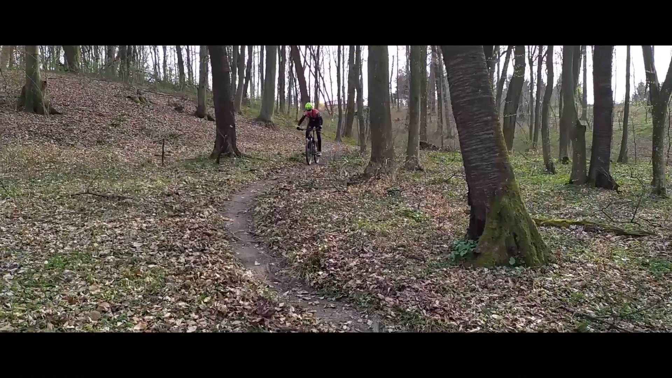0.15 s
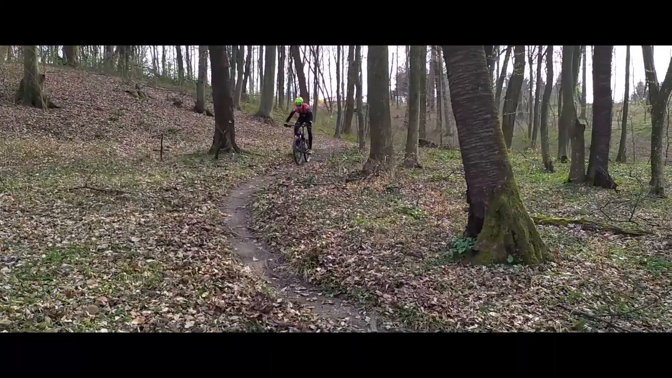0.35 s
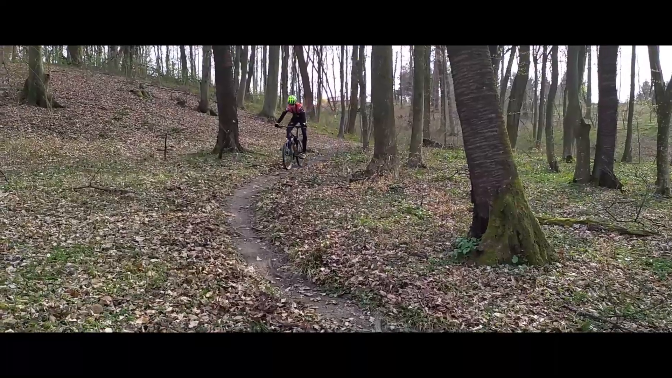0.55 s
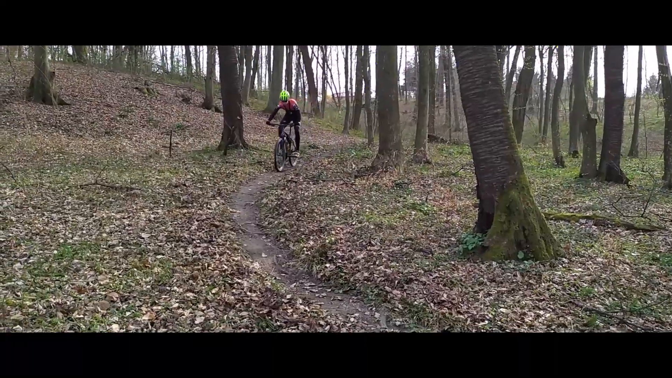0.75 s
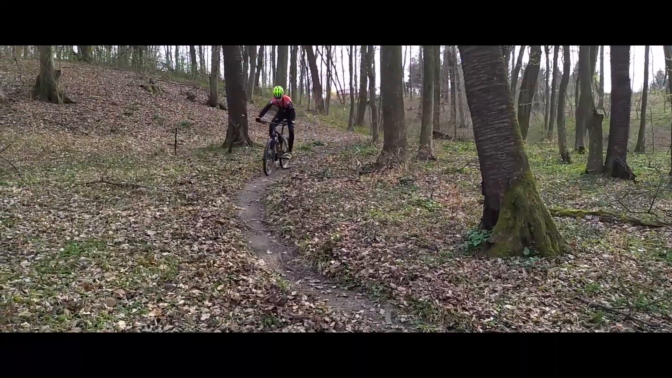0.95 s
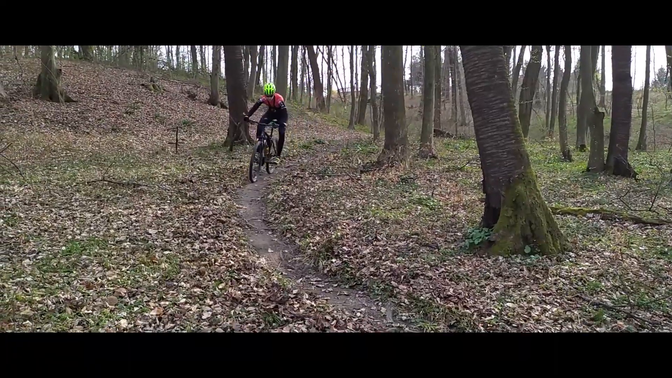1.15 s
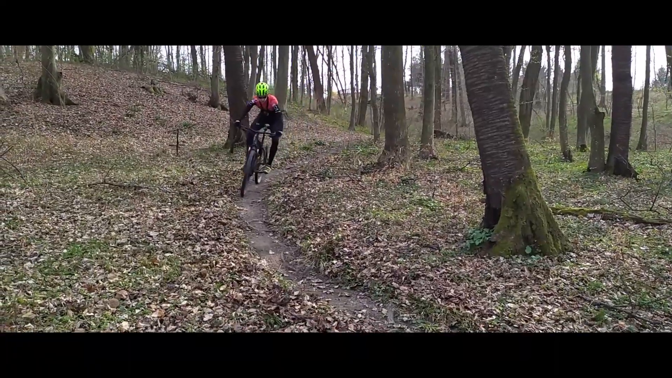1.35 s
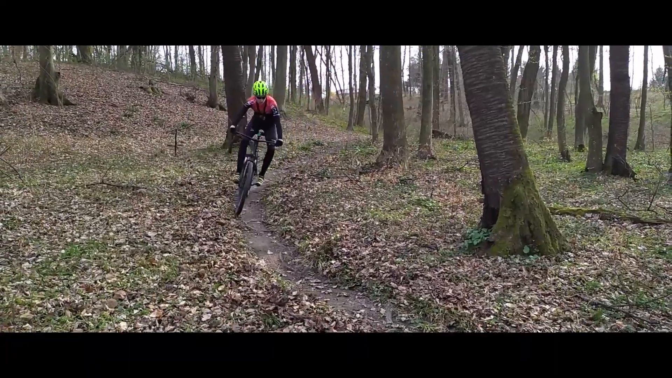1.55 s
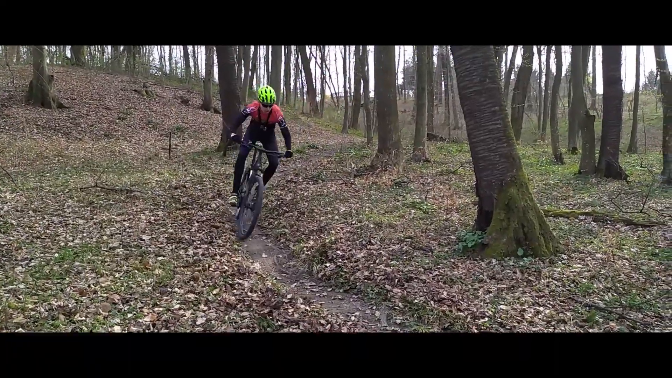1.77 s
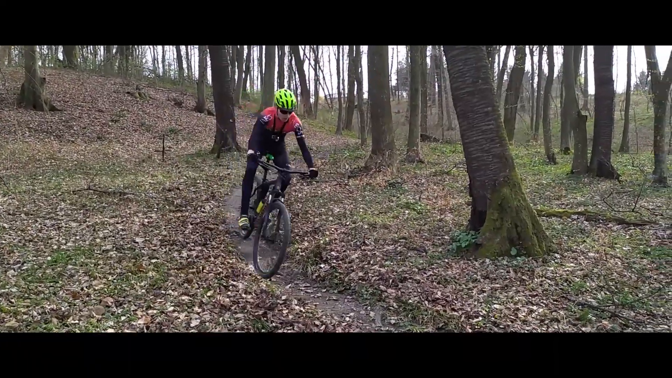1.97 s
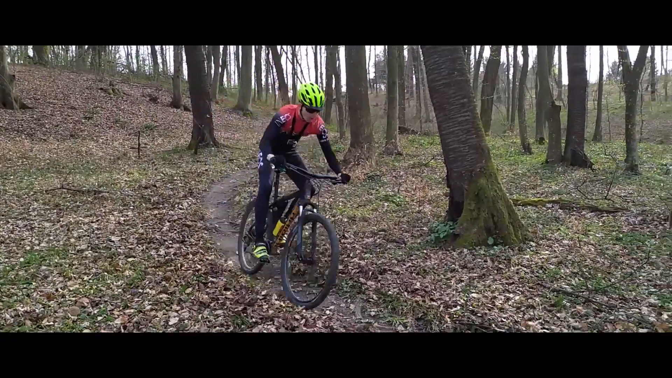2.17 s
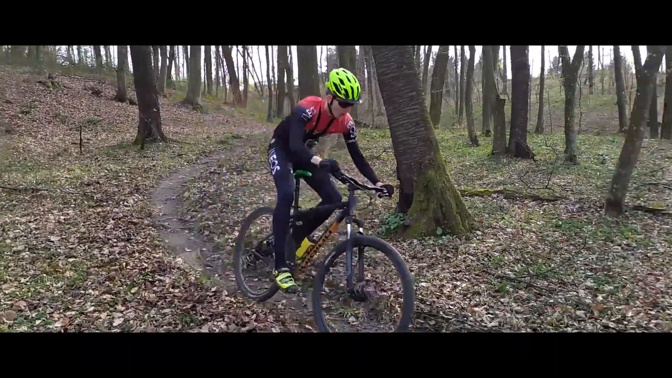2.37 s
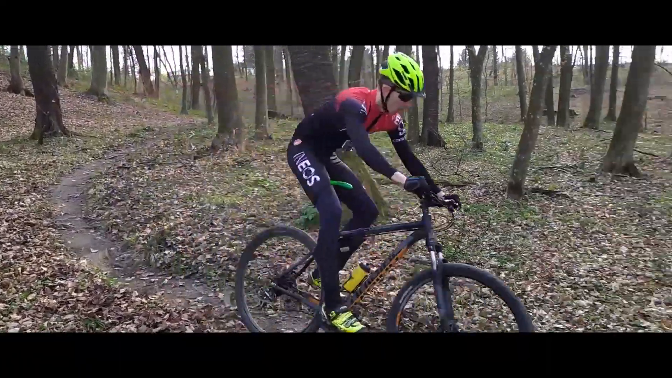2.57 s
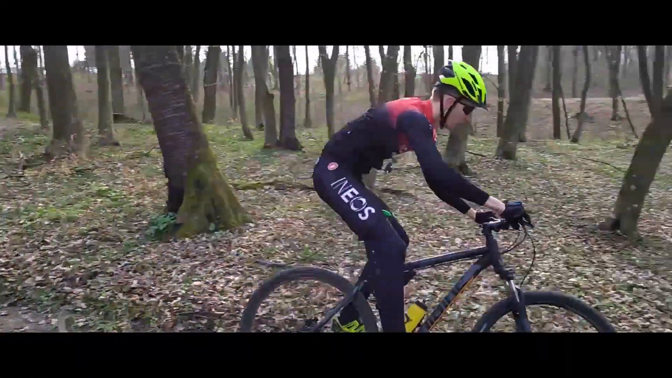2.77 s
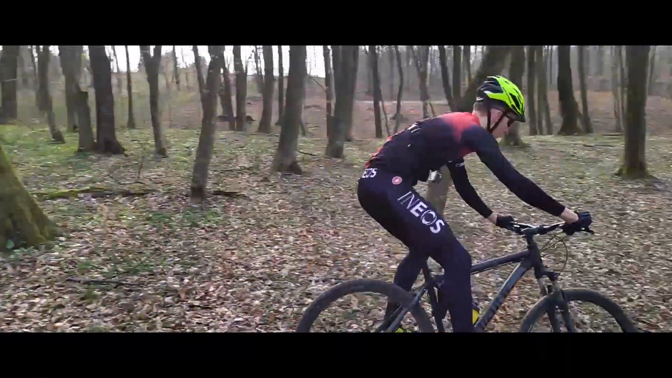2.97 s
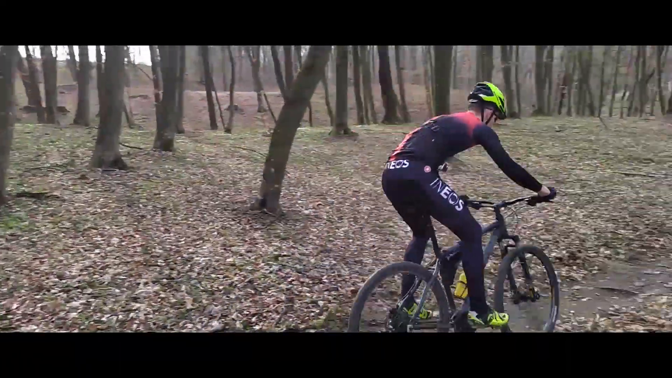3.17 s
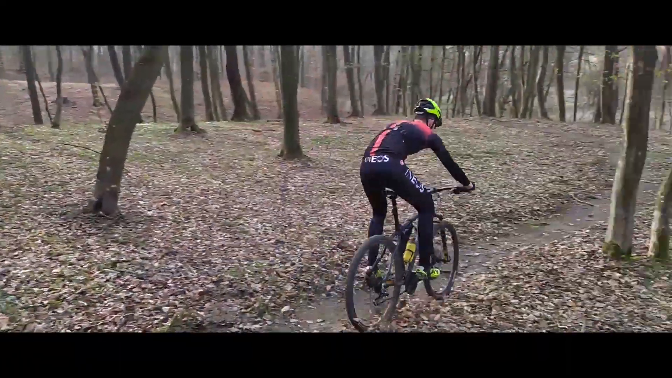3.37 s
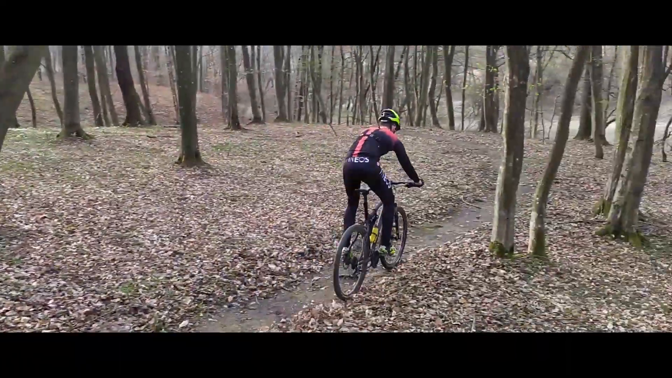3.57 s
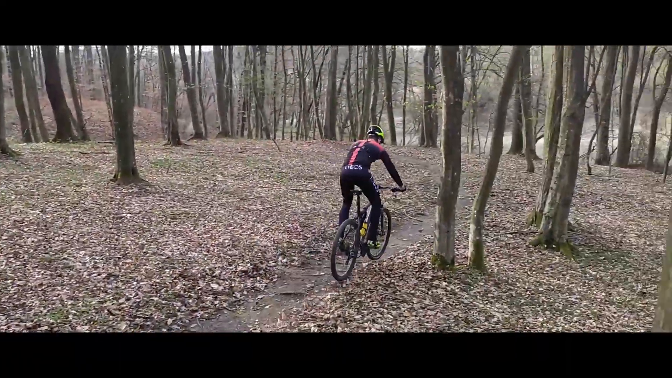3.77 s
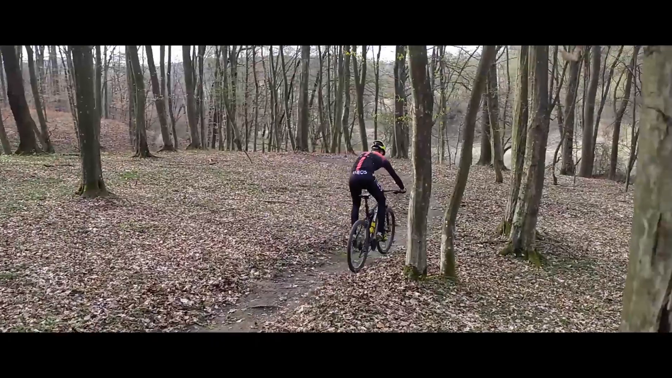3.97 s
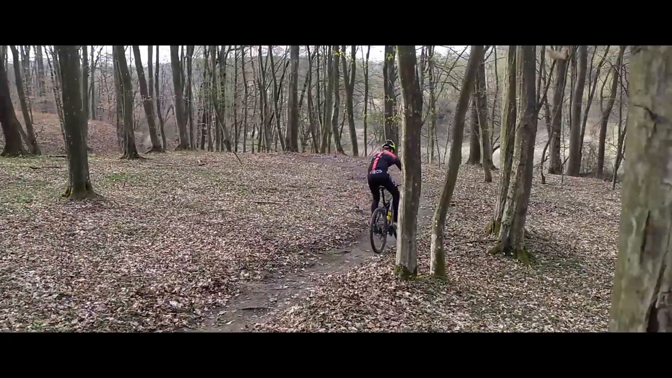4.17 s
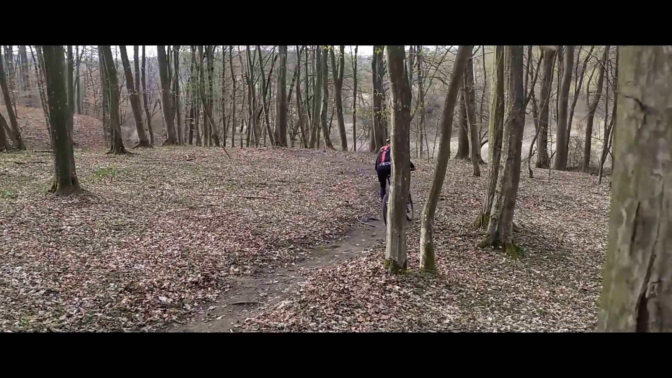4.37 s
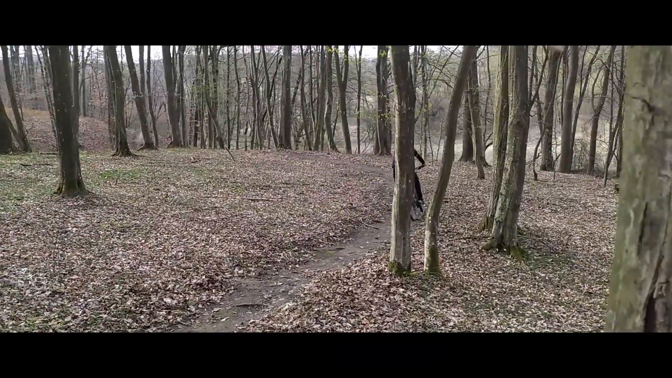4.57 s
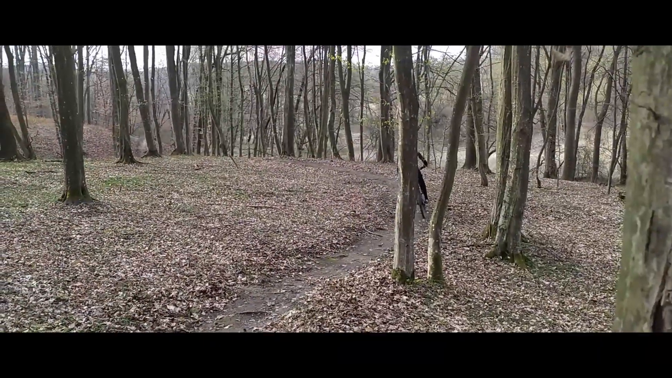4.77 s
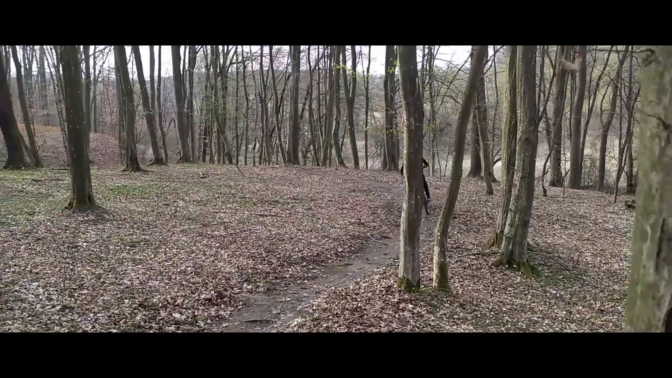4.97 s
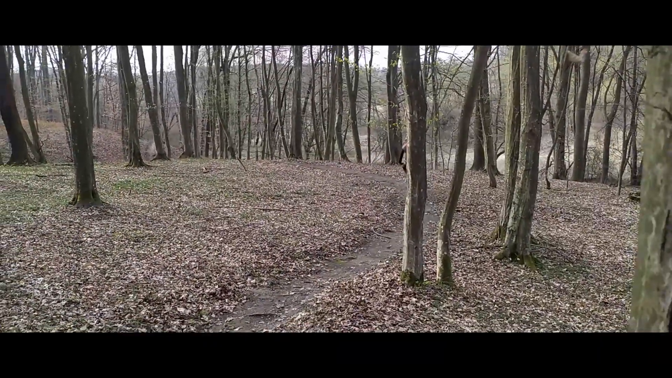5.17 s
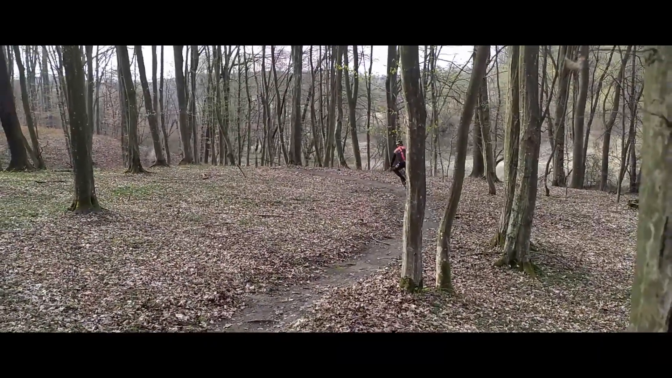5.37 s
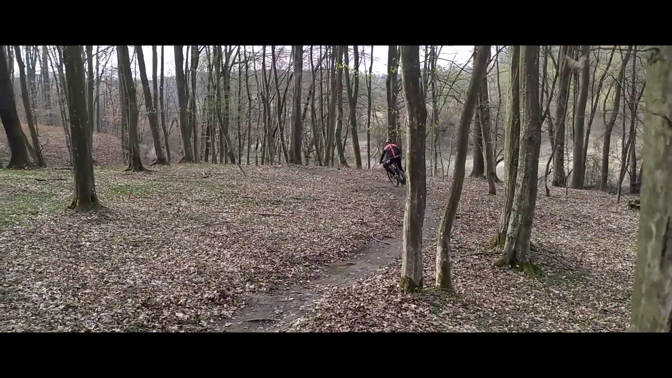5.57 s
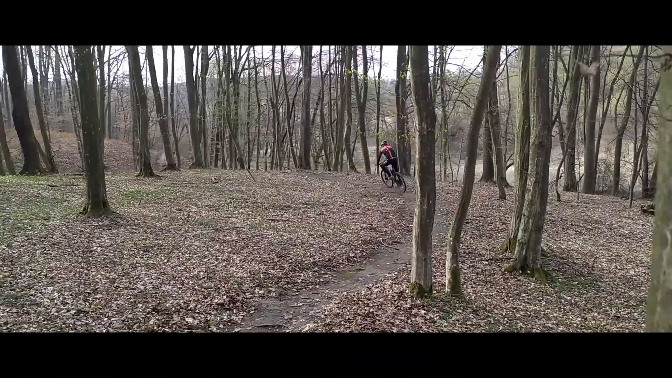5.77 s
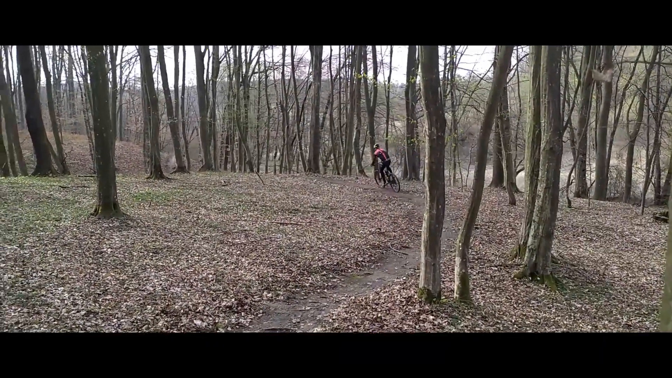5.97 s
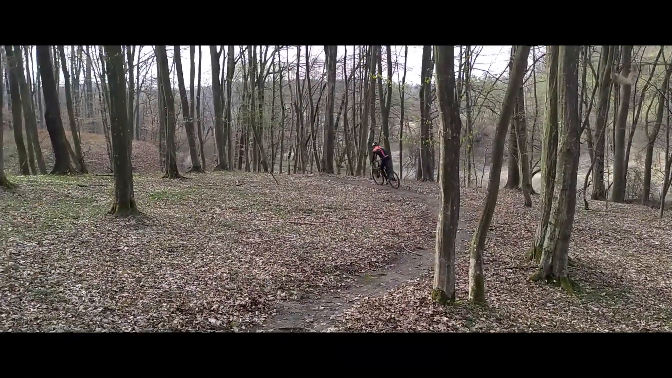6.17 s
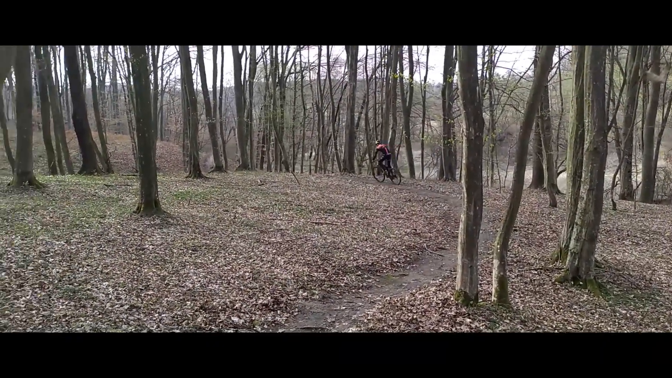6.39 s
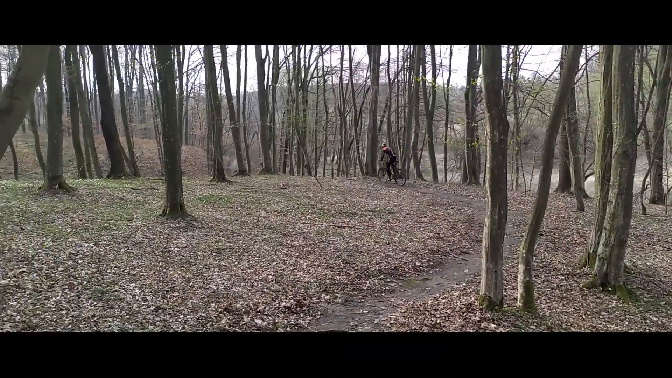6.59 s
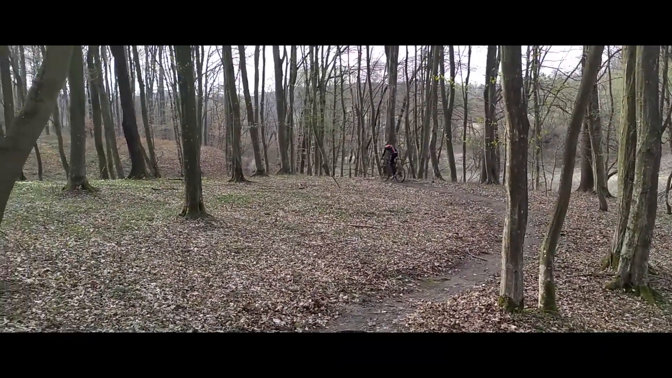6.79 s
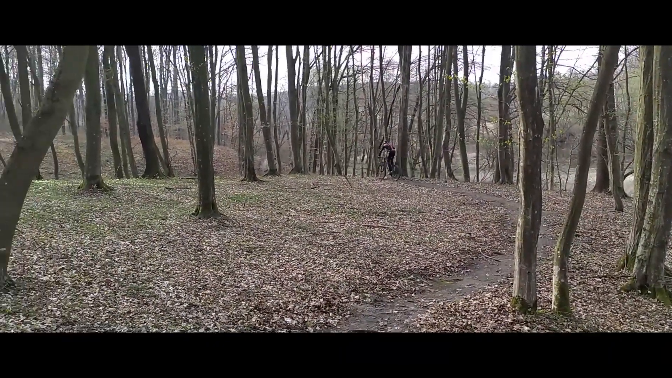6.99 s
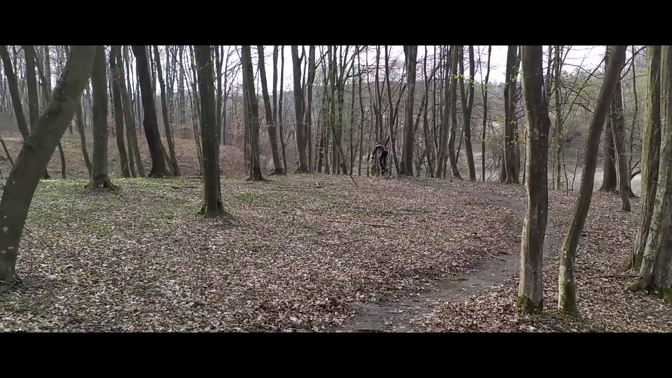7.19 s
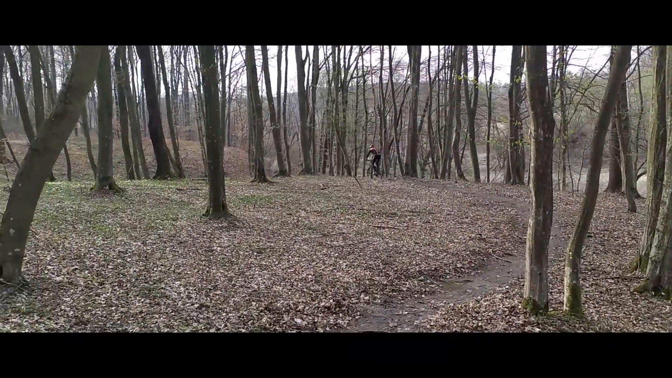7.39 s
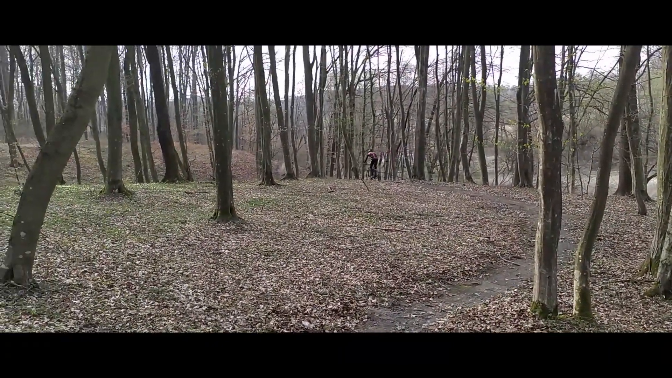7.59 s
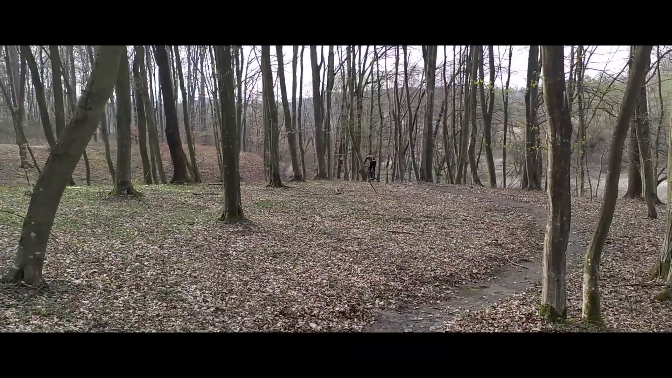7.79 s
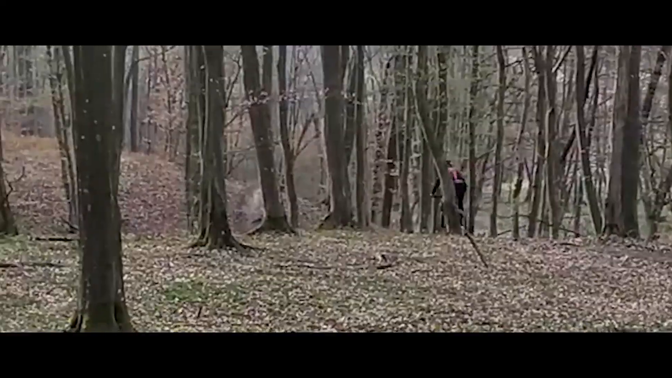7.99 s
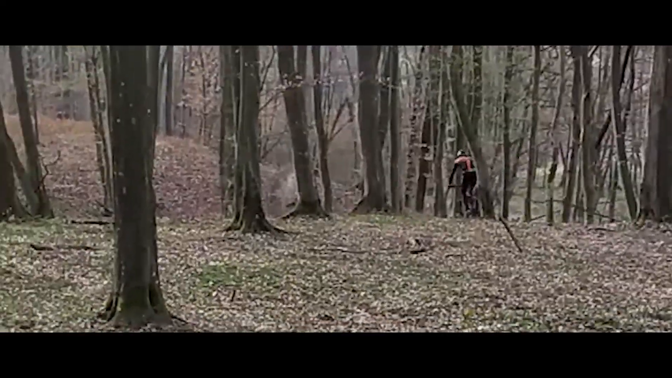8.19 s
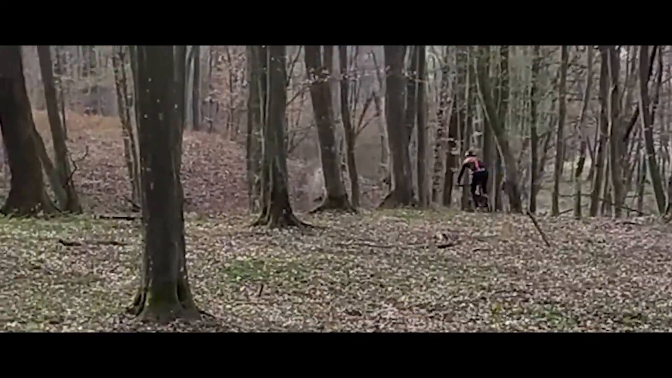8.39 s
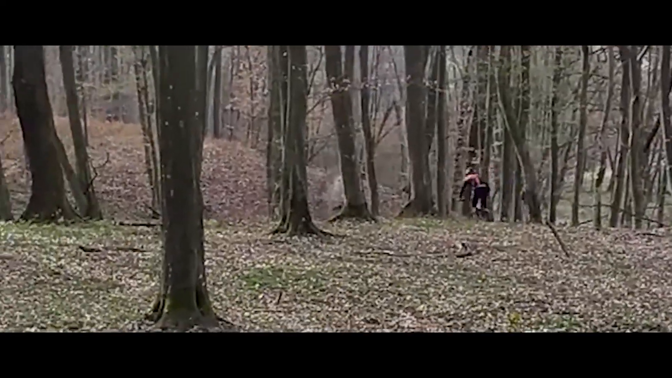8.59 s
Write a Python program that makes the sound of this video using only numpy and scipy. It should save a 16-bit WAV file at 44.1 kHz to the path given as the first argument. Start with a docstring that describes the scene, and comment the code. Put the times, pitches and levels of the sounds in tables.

```python
"""On a dirt trail in a quiet wood, a mountain bike approaches, passes close by and rides away.
Its tyres crush dry leaves and snap twigs, each fracture a brief burst of noise, and roots knock
the wheels into damped vibration. The chain rattles on the frame; friction rings a brake disc.
A bird whistles rising notes. The trunks scatter whistles, slaps and snaps into a soft reverberation."""
import sys
import numpy as np
from scipy import signal
from scipy.fft import rfft, irfft, next_fast_len
from scipy.io import wavfile
from scipy.ndimage import uniform_filter1d, map_coordinates

SR = 44100
rng = np.random.default_rng(int(sys.argv[2]) if len(sys.argv) > 2 else 0)


def to_wav(s):
    """Save 16-bit WAV."""
    ch = np.atleast_2d(s).T  # columns
    pcm = np.round(np.clip(ch, -1, 1) * 32767)  # PCM
    wavfile.write(sys.argv[1], SR, pcm.astype(np.int16))


N = 381024
PASS_S, MISS_M, SPEED_M_PER_S = 3.05, 2.31, 4.69  # closest approach: time, distance, speed
HARD_SLAP_DB = -16.5  # reference level for the length and jingle of a chain slap


def amp(db):
    """Amplitude ratio of a level in decibels."""
    return 10 ** (np.asarray(db) / 20)


def unit(x):
    """Normalisation to rms 1."""
    return x / np.sqrt(np.mean(x ** 2) + 1e-20)


def along(points, hz):
    """Interpolation of (frequency_hz, value) points on a logarithmic frequency axis."""
    frequencies, values = np.transpose(points)
    return np.interp(np.log(hz + 1), np.log(frequencies + 1), values)


def curves(rows, size=N):
    """Linear interpolation in time: one curve for each column after time_s."""
    times, *columns = np.transpose(rows)
    return [np.interp(np.arange(size) / SR, times, column) for column in columns]


def wobble(rate_hz):
    """Random modulation: a smooth curve through evenly spaced Gaussian values."""
    knots = rng.standard_normal(8192)
    return map_coordinates(knots, [np.arange(N) * rate_hz / SR], mode="wrap")


def filtered(x, response):
    """Linear filtering: the spectrum is multiplied by a frequency response."""
    size = x.shape[-1]
    padded = next_fast_len(size + 4096)
    return irfft(rfft(x, padded) * response(np.fft.rfftfreq(padded, 1 / SR)), padded)[..., :size]


def colour(x, spectrum):
    """Spectral shaping by (frequency_hz, gain_db) points, at rms 1."""
    return unit(filtered(x, lambda hz: amp(along(spectrum, hz))))


def noise(spectrum, side_db=0):
    """Partly coherent stereo noise of rms 1: the weaker the side part, the nearer to mono."""
    mid, side = rng.standard_normal((2, N))
    return colour(mid + amp(side_db) * np.array([side, -side]), spectrum)


def add(track, start_s, sound):
    """Superposition of a sound on a track."""
    start = max(round(start_s * SR), 0)
    part = sound[..., :N - start]
    track[:, start:start + part.shape[-1]] += part


def ride():
    """Spherical spreading: gain in dB re the closest point, nearness 0-1, heading (1 coming, -1 going)."""
    near_m, behind_m = 6, 0.31  # the near zone: radius about a point just behind the bike
    ahead_m = SPEED_M_PER_S * (PASS_S - np.arange(N) / SR)
    distance_m = np.hypot(MISS_M, ahead_m)
    zone_distance_m = np.hypot(MISS_M, ahead_m + behind_m)
    near = np.clip(0.11 + 0.86 / (1 + (zone_distance_m / near_m) ** 6), 0, 1)
    return 20 * np.log10(MISS_M / distance_m), near, ahead_m / distance_m


def fractures(rate_hz, spread_db, life_s):
    """Poisson process: the envelope of tiny breaks, mostly weak, whose energies add and decay."""
    occurs = rng.random(N) < rate_hz / SR
    hits = occurs * amp(spread_db * np.minimum(rng.exponential(size=N), 4))
    fall = np.exp(-2 / (life_s * SR))
    return unit(np.sqrt(signal.lfilter([1], [1, -fall], hits ** 2)))


def patches(x, depth_db):
    """Spectral modulation: each crushed leaf has its own colour, so gain varies in frequency and time."""
    spectra = signal.stft(x, nperseg=256)[2]
    field = uniform_filter1d(rng.standard_normal(spectra.shape[1:]), size=4, axis=0)
    field = uniform_filter1d(field, size=9, axis=1)
    return unit(signal.istft(spectra * amp(depth_db * unit(field)), nperseg=256)[1][:, :N])


def leaves():
    """Brittle fracture: leaves break in clumps over a scrub of dirt, brighter and wider close by."""
    # thickness of the leaf cover, as crackle gain: time_s, gain_db
    litter = [(0, -19.5), (.58, -14.5), (1.49, -18.5), (1.92, -11.5), (2.13, -4.5), (2.58, -6), (2.74, -2),
              (3.3, -1), (3.69, -11.5), (3.91, -6), (4.14, -11.5), (4.3, -21), (4.67, -16), (5.9, -28),
              (7.4, -20), (8.64, -23.5)]
    # a tyre shoving through drifts of leaves: middle_s, level_db, half_length_s
    scuffs = [(0.508, -49.5, 0.033), (1.475, -50.5, 0.016), (1.659, -44.5, 0.014), (1.755, -45.5, 0.016),
              (2.307, -35, 0.073), (2.527, -37, 0.018), (2.688, -27, 0.034), (2.825, -28, 0.01),
              (3.09, -29, 0.03), (3.244, -32.5, 0.032), (3.324, -31.5, 0.04), (3.521, -35, 0.052),
              (3.757, -37.5, 0.011), (3.858, -33.5, 0.011), (4.464, -49.5, 0.012), (6.217, -60.5, 0.29),
              (7.404, -58.5, 0.087)]
    # spectra of near crackle, far crackle and dirt: frequency_hz, density_db
    near_leaves = [(650, -38.5), (1100, -19), (1600, -13.5), (2000, -16.5), (2550, -10), (7000, -3),
                   (10000, -1), (12500, -4.5), (15500, -12.5)]
    far_leaves = [(500, -2), (1500, 6), (5000, 4.5), (7500, 6.5), (10000, 0.5), (15500, -16)]
    dirt = [(260, -27.5), (390, 7.5), (620, 2), (880, 6.5), (1600, 4.5), (6000, -6)]
    spread_db, near, _ = ride()
    crackle_db = -30.5 + spread_db + curves(litter)[0]
    clumps, t = wobble(45), np.arange(N) / SR
    drifts = sum(amp(db) * np.exp(-((t - s) / half_s) ** 2) for s, db, half_s in scuffs)
    faint = .35 + 1.1 * near  # close by, countless faint breaks fill the gaps
    grains = (fractures(rate_hz=2000, spread_db=4.2, life_s=.0007) + faint) / (1 + faint)
    diffuse, direct = rng.standard_normal((2, N)), rng.standard_normal(N)
    # from afar one wavefront arrives, on the right first
    coherent = .7 * (1 - near) * np.array([np.roll(direct, 9), direct])
    breaks = patches(grains * (diffuse + coherent), depth_db=2.5)
    crackle = np.sqrt(near) * colour(breaks, near_leaves) + np.sqrt(1 - near) * colour(breaks, far_leaves)
    flicker_db = clumps + (1 - near / 2) * wobble(180)
    crackle *= np.hypot(amp(crackle_db), drifts) * amp(1 + flicker_db)
    grit = fractures(rate_hz=900, spread_db=2.5, life_s=0.00066)
    scrub = colour(grit * (rng.standard_normal((2, N)) + coherent), dirt)
    scrub_db = crackle_db - 13.2 * near  # the dull scrub carries farther than the crackle
    return crackle + scrub * amp(scrub_db + 4.03 * clumps)


def ring(modes, t, scatter_db):
    """Free vibration: exponentially decaying modes with random strengths and phases."""
    hz, db, t60 = np.transpose(modes)[:, :, None]
    strength = amp(db + scatter_db * rng.standard_normal(hz.shape) - 60 * t / t60)
    return np.sum(strength * np.sin(2 * np.pi * (hz * t + rng.random(hz.shape))), 0)


def wheels():
    """Forced and free vibration: rough ground drums through the tyres; roots strike the wheel's modes."""
    # unevenness of the ground, as rumble gain: time_s, gain_db
    ground = [(0, 0), (1.4, -4.5), (2.1, 1), (2.9, -9), (3.75, 2), (4.6, 1), (5.5, -5.5), (6.2, 1.5),
              (7.3, 2)]
    # spectra of ground rumble and hollow tyre casing: frequency_hz, density_db
    rumble_spectrum = [(28, -37), (50, 7.5), (65, 5), (100, 2), (450, -19.5), (900, -57.5)]
    casing_spectrum = [(150, -16.5), (240, -4), (282, 3), (325, -7.5), (800, -41.5)]
    # drops over roots: start_s, level_db
    thuds = [(0.132, -48.5), (0.315, -47.5), (.978, -38), (1.741, -37.5), (2.072, -35.5), (2.339, -38.5),
             (2.437, -38), (2.524, -36), (2.601, -35.5), (3.355, -40.5), (3.821, -40), (3.944, -40.5),
             (7.086, -49), (7.266, -48.5)]
    # modes of wheel and frame: frequency_hz, level_db, t60_s
    wheel_modes = [(77, 0.5, 0.1), (161, 4.5, 0.034), (277.5, -1.5, 0.086), (377, -1, 0.042),
                   (882, -6, 0.074)]
    bumps_db = curves(ground)[0] + 2.2 * wobble(22)
    spread_db, _, heading = ride()
    rumble = noise(rumble_spectrum, side_db=-25) * amp(-50 + spread_db + bumps_db)
    # the casing is louder ahead, and soft ground damps it beyond plain spreading
    casing_db = -53.5 + 1.17 * spread_db + 5 * heading + bumps_db
    casing = noise(casing_spectrum, side_db=-13) * amp(casing_db)
    knocks, t = np.zeros((2, N)), np.arange(SR // 4) / SR
    onset = 1 - np.exp(-t / 0.0022)  # the soft tyre rounds off the blow
    for start_s, db in thuds:
        add(knocks, start_s, amp(db - 4) * onset * ring(wheel_modes, t, scatter_db=2))
    return rumble + casing + knocks


def bird():
    """Frequency modulation: a pure, slightly wavering whistle sweeps upward and dips as it ends."""
    # whistled notes: start_s, level_db, top_pitch_hz
    notes = [(0.033, -43, 3230), (0.382, -42.5, 3302), (0.713, -43, 3276), (1.085, -44.5, 3256),
             (8.134, -45.5, 3096), (8.461, -44.5, 3240)]
    # contour of one note: time_s, share_of_top_pitch, gain_db
    whistle = [(0, 0.7, -17.5), (.055, 0.77, -11.5), (.115, 0.91, -9.5), (.17, 1, -5.5), (.2, 0.82, -22)]
    out = np.zeros((2, N))
    share, shape_db = curves(whistle, size=SR // 5)
    for start_s, db, top_hz in notes:
        pitch_hz = top_hz * share * (1 + .005 * wobble(60)[:len(share)])
        add(out, start_s, amp(db + shape_db) * np.sin(2 * np.pi * np.cumsum(pitch_hz) / SR))
    return out * amp([[1], [-1]])  # a little to the left


def trunks(x, early=0):
    """Multiple scattering: trees return a diffuse tail; those by the trail add early reflections."""
    # reverberation of the wood: frequency_hz, t60_s
    wood = [(1000, 0.97), (3000, 0.8), (8000, 0.62)]
    hz, t, spectra = signal.stft(rng.standard_normal((2, SR)), SR, nperseg=256)
    decay = amp(-60 * t / along(wood, hz)[:, None]) * (1 - np.exp(-t / 0.0018))
    decay *= 1 + early * np.exp(-t / 0.016)
    tail = signal.istft(spectra * decay, SR, nperseg=256)[1]
    return signal.fftconvolve(x, tail / np.linalg.norm(tail[0]), axes=1)[:, :N]


def wavefront(size):
    """Interaural delay: noise from one point arrives on the right first, with scatter off the ground."""
    direct = rng.standard_normal(size)
    return .8 * np.array([np.roll(direct, 8), direct]) + .6 * rng.standard_normal((2, size))


def ripple(x, depth_db, width_hz):
    """Modal excitation: each contact wakes other resonances, giving random spectral peaks and dips."""
    heights = rng.standard_normal(512)
    return unit(filtered(
        x, lambda hz: amp(depth_db * map_coordinates(heights, [hz / width_hz], mode="wrap"))))


def resonances(modes, hz):
    """Modal superposition: the frequency response of damped resonators, alternating in sign."""
    return sum((-1) ** k * amp(db) * 1j * hz * width / (centre ** 2 - hz ** 2 + 1j * hz * width)
               for k, (centre, width, db) in enumerate(modes))


def slap(start_s, db, clank_db, attack_s, length_s):
    """Impact excitation: links strike in a dry rattle that jingles the sprockets and clanks the frame."""
    # spectra of struck links and frame: frequency_hz, density_db
    link_spectrum = [(1500, -15), (2900, -12), (4100, -2), (5500, -3.5), (6400, 0.5), (7500, -2.5),
                     (9000, 4), (15500, -15)]
    frame_spectrum = [(200, -29.5), (900, -12.5), (1700, 4.5), (2600, 7), (4000, 3.5), (9000, -41.5)]
    # sprocket resonances: frequency_hz, width_hz, gain_db
    sprockets = [(6350, 140, -8), (8020, 150, 1.5), (9300, 92, 2.5), (9840, 240, -7), (10177, 160, -2),
                 (11030, 85, 5.5)]
    t = np.arange(SR // 12) / SR
    envelope = (1 - np.exp(-t / attack_s)) * (np.exp(-(t / length_s) ** 1.5) + .08 * np.exp(-t / .02))
    contacts = amp(2 * np.repeat(rng.standard_normal(len(t)), 24)[:len(t)])
    strikes = envelope * contacts * wavefront(len(t))
    links = ripple(colour(strikes, link_spectrum), depth_db=3, width_hz=330)
    jingle = ripple(filtered(strikes, lambda hz: resonances(sprockets, hz)), depth_db=2, width_hz=200)
    # more jingle in harder slaps, and more ahead of the bike than behind it
    jingle_db = 2.5 + 0.59 * (db - HARD_SLAP_DB) + 4.5 * np.sign(PASS_S - start_s)
    frame = ripple(colour(strikes, frame_spectrum), depth_db=3, width_hz=220)
    gain = np.sqrt(np.mean(envelope ** 2)) * amp(db - 3.5)
    return gain * (links + amp(jingle_db) * jingle + amp(clank_db - 7.5) * frame)


def chain():
    """Repeated impact: bumps slap the chain on the frame, and harder slaps rattle for longer."""
    # chain slaps: start_s, level_db, frame_clank_db
    slaps = [(0.403, -28, 2.5), (0.692, -35.5, 2.5), (1.096, -36, 8.5), (1.127, -36, 5.5),
             (1.648, -31.5, -12), (2, -24, -6), (2.089, -19.5, -4), (2.577, -24, -12), (2.837, -22.5, -22),
             (2.93, -16, -1), (3.776, -23, -9), (3.842, -28, 4.5), (4.0678, -17.5, 1.5), (4.207, -26, -6),
             (4.322, -36, 5), (4.781, -34, 0.5), (4.931, -37, 5.5), (5.435, -28, -12), (5.782, -36.5, -0.5),
             (6.418, -38, 2.5), (7.192, -40.5, 6.5), (7.297, -31.5, 0.5), (7.384, -38.5, 0.5),
             (7.419, -34.5, 2.5), (7.536, -42.5, 4.5), (7.664, -43.5, 7), (8.504, -41.5, -14)]
    out = np.zeros((2, N))
    for start_s, db, clank_db in slaps:
        length_s = 0.0089 * amp(0.13 * (db - HARD_SLAP_DB))
        add(out, start_s, slap(start_s, db, clank_db, attack_s=.0015, length_s=length_s))
    for start_s in 7.734 + .149 * np.arange(4):  # the slack chain flaps evenly before the last light slap
        add(out, start_s, slap(start_s, db=-51, clank_db=8, attack_s=0.0028, length_s=0.03))
    return out


def brake():
    """Frictional excitation: the pads catch and scrape, and the disc resonates in a hollow band of tones."""
    # the disc rubbing its pads: start_s, level_db, length_s
    rubs = [(0.474, -52, 0.18), (1.106, -52.5, 0.12), (2.289, -41.5, 0.073), (3.86, -48.5, 0.11),
            (4.721, -49.5, 0.063), (5.05, -54.5, 0.17), (7.737, -66, 0.67)]
    # disc resonances: frequency_hz, width_hz, gain_db
    disc = [(832, 31, 6), (1225, 42, 4), (1690, 65, 5), (2280, 150, 1), (2690, 250, 3), (3610, 68, 4)]
    envelope, t = np.zeros((1, N)), np.arange(SR // 2) / SR
    for start_s, db, length_s in rubs:
        add(envelope, start_s, amp(db) * (1 - np.exp(-t / 0.00082)) * np.exp(-(t / length_s) ** 2))
    friction = rng.standard_normal((2, N)) * amp(1.5 * wobble(110))
    return envelope * unit(filtered(friction, lambda hz: resonances(disc, hz)))


def twigs():
    """Impulsive fracture: one sharp crack and a brief splintering, coloured by the twig's size."""
    # twigs and grit snapping under a tyre: start_s, level_db, pitch_hz
    snaps = [(.982, -27, 4170), (1.844, -21.5, 7440), (1.933, -18, 7300), (2.031, -27, 8500),
             (2.074, -25, 3700), (2.27, -16, 8480), (2.288, -8.5, 8200), (2.783, -19, 8100),
             (3.066, -31, 7330), (3.086, -20.5, 8770), (3.459, -17.5, 4750), (3.897, -21, 4320),
             (4.02, -22, 6040), (4.15, -22.5, 3510), (4.271, -27.5, 5270), (4.55, -32, 4280),
             (6.245, -27, 2530), (6.75, -41, 1010), (6.856, -35.5, 4500)]
    out, t = np.zeros((2, N)), np.arange(SR // 20) / SR
    for start_s, db, hz in snaps:
        splinters = wavefront(len(t)) * (np.exp(-(t / .0032) ** 2) + .2 * np.exp(-t / .01))
        crack = np.pad(3 * (t == 0) + splinters, ((0, 0), (22, 0)))
        crack = colour(crack, [(hz / 8, -19), (hz / 2, -5), (hz, 0), (hz * 2, -8), (hz * 8, -27)])
        crack = ripple(crack, depth_db=2, width_hz=450)
        add(out, start_s, amp(db + 1) * crack / np.abs(crack).max())
    return out


def passing_colour(bike):
    """Time-varying filtering: slightly duller on the approach, shaded on the left when off to the right."""
    # softer top treble and a dip near 1.7 kHz during the approach: frequency_hz, gain_db
    approach_colour = [(1000, 0.5), (1700, -4.5), (3000, -0.5), (10500, -4.5), (13000, -5.5)]
    # how far the bike lies to the right until the listener turns after it: time_s, share
    bearing = [(1.2, 0.7), (2, .95), (2.55, 1), (2.75, 0.13)]
    # response on each side to sound from the right: frequency_hz, gain_db
    left_shade = [(1300, -1.5), (4400, -3), (8000, -12.5), (14000, -7.5)]
    right_lift = [(1000, -1), (10500, 3.5), (13000, -3.5)]
    _, _, heading = ride()
    approach = np.maximum(heading, 0) ** 4
    bike = (1 - approach) * bike + approach * filtered(bike, lambda hz: amp(along(approach_colour, hz)))
    aside, = curves(bearing)
    shaded = filtered(bike, lambda hz: amp([along(left_shade, hz), along(right_lift, hz)]))
    balance = amp([[-1.75], [1.75]])  # the trail stays a little to the right
    return ((1 - aside) * bike + aside * shaded) * balance


def scene():
    """Superposition of bike, bird and still air; slaps and snaps are more reverberant from afar."""
    # spectrum of the still air: frequency_hz, density_db
    air_spectrum = [(26, -13), (56, -4.5), (400, -19.5), (1000, -15), (10000, -20.5), (16000, -37.5)]
    spread_db, _, _ = ride()
    hits, song = chain() + twigs(), bird()
    echo_db = -12 - 0.39 * spread_db
    bike = passing_colour(leaves() + brake() + hits + trunks(hits * amp(echo_db), early=1))
    far_song = amp(-5) * song + amp(-0.5) * trunks(song)
    air = noise(air_spectrum, side_db=1)
    return bike + wheels() + far_song + amp(-66.5) * air


def record(dry):
    """Band limiting: the deepest bass rolls off and the highest treble is cut."""
    low_hz, top_hz = 34, 16000
    return filtered(dry, lambda hz: (hz < top_hz) * hz ** 6 / (hz ** 6 + low_hz ** 6))


dry = scene()
out = record(dry)
to_wav(out)
```